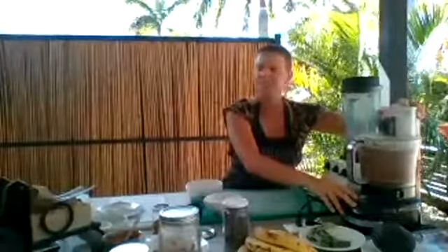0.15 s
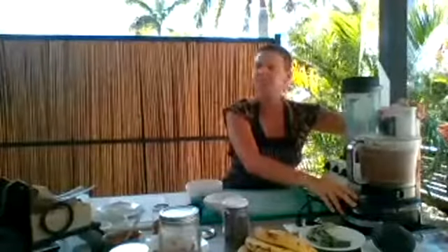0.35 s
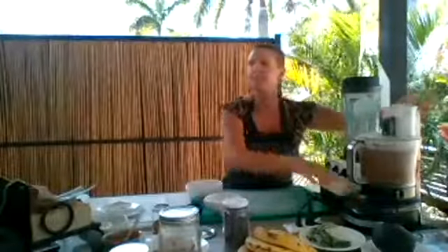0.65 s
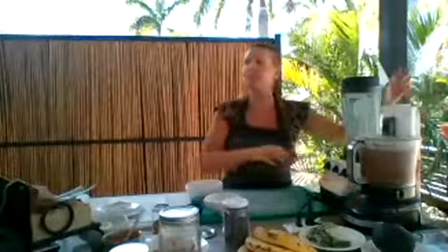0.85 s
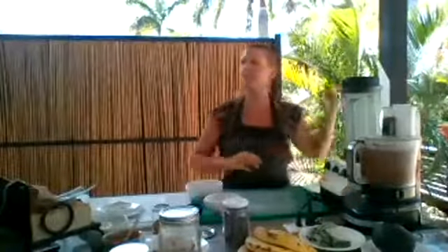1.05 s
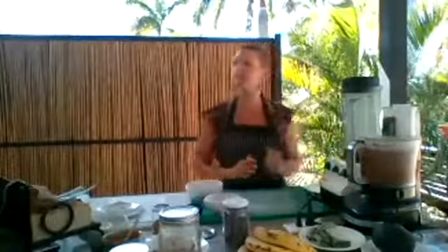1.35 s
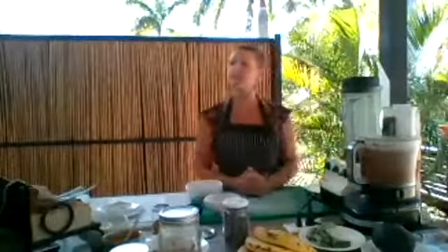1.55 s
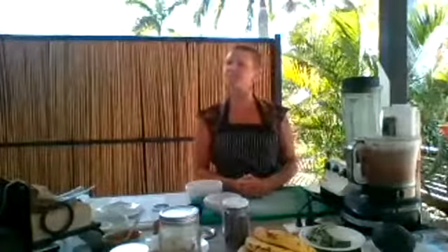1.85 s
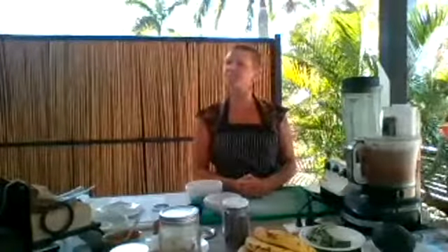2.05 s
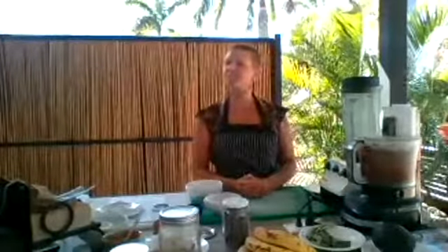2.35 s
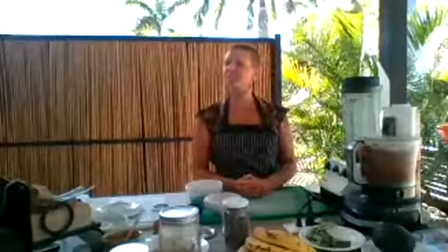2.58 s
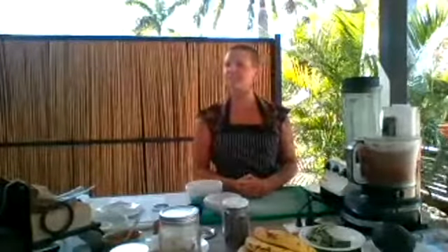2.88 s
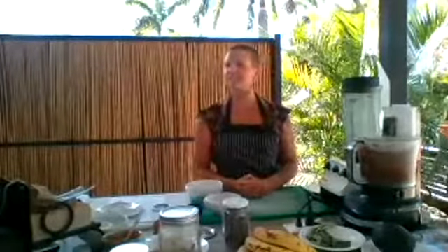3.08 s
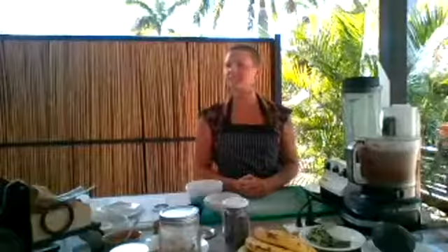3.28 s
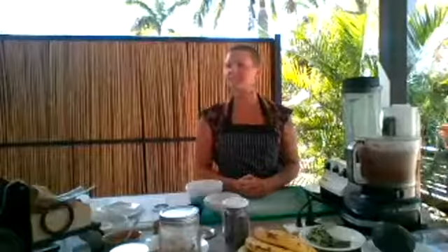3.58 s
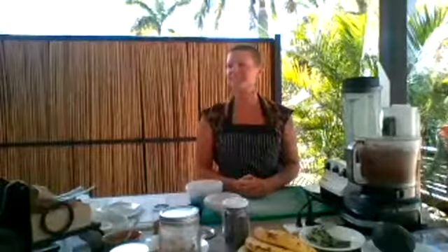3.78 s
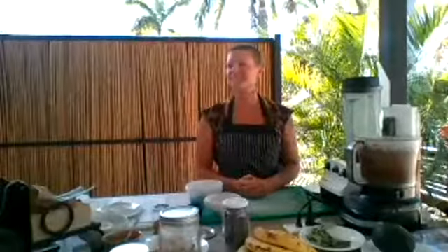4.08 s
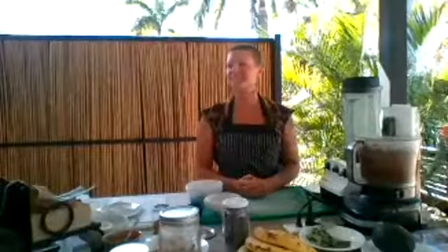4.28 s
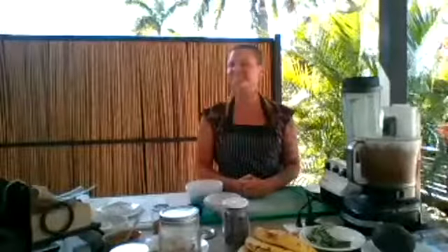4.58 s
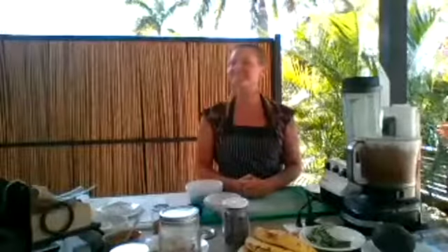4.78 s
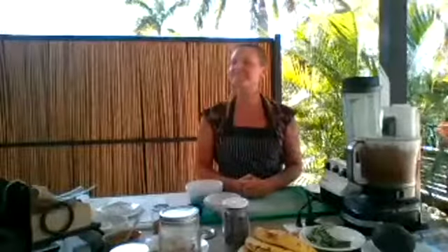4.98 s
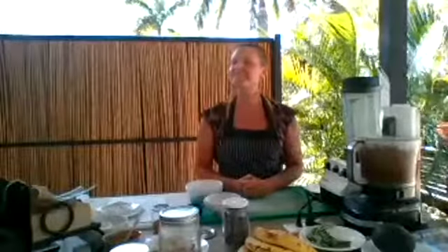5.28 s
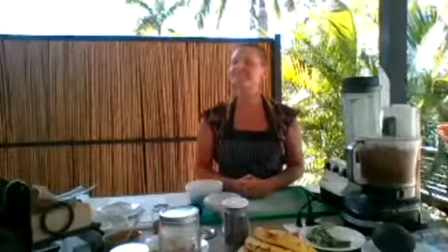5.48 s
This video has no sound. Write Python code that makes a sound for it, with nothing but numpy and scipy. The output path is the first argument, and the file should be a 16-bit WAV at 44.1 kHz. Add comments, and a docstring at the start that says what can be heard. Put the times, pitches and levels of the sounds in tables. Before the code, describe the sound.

A food processor loudly grinds nuts, then drops after two seconds to a quieter, fading motor whine that wavers and throbs.

```python
"""Under an open porch, a food processor grinds nuts on a table, heard through a small mono microphone.
Churning crumbs force the bowl into a resonant roar, pieces snap on the blade, and the base bumps the
table. After two seconds the roar drops at once and fades on, leaving the whine of the drive's meshing
teeth, which sags in pitch when lumps brake the blade and throbs with its turns."""
import sys
import numpy as np
from scipy import signal
from scipy.fft import irfft, next_fast_len
from scipy.io import wavfile
from scipy.ndimage import uniform_filter1d, minimum_filter1d

SR = 44100
rng = np.random.default_rng(int(sys.argv[2]) if len(sys.argv) > 2 else 0)


def waveform_to_disk(signal):
    """Save audio, clipped to [-1, 1], as 16-bit WAV at the path in sys.argv[1]."""
    frames = np.transpose(np.atleast_2d(signal))
    scaled = np.clip(frames, -1, 1) * 32767
    samples = np.round(scaled).astype(np.int16)
    wavfile.write(sys.argv[1], SR, samples)


N = 248283


def gain_of(db):
    """The decibel law: a tenfold amplitude for every 20 dB."""
    return 10 ** (np.asarray(db) / 20)


def unit_rms(x):
    """Normalisation to unit mean power."""
    return x / np.sqrt(np.mean(x ** 2) + 1e-20)


def curves(rows, t):
    """Linear interpolation of each column over time."""
    times, *columns = np.transpose(rows)
    return [np.interp(t, times, column) for column in columns]


def spectrum_db(rows, hz):
    """A spectral envelope, interpolated over logarithmic frequency."""
    f, db = np.transpose(rows)
    return np.interp(np.log(hz + 1), np.log(f + 1), db)


def hump(t, peak_s, length_s, rise_share=0.54):
    """A raised-cosine envelope: up to 1 at peak_s and back to 0."""
    u = (t - peak_s) / np.where(t < peak_s, rise_share * length_s, (1 - rise_share) * length_s)
    return np.cos(np.pi / 2 * np.clip(u, -1, 1)) ** 2


def drift(width_hz):
    """Low-pass Gaussian noise of rms 1, changing about width_hz times a second."""
    size = next_fast_len(N)
    hz = np.fft.rfftfreq(size, 1 / SR)
    hz = hz[hz < 4 * width_hz]
    real, imag = rng.standard_normal((14000, 2))[:len(hz)].T
    rolloff = np.exp(-(hz[:len(real)] / width_hz) ** 2)
    return unit_rms(irfft((real + 1j * imag) * rolloff, size)[:N])


def mottle(shape, bins, frames):
    """A random field of rms 1, correlated in frequency and time by moving averages."""
    field = rng.standard_normal(shape[::-1]).T
    return unit_rms(uniform_filter1d(uniform_filter1d(field, bins, axis=0), frames, axis=1))


def rough_tone(hz, steady, wobble_hz, narrow_hz, wide_hz, skirt, swell=0):
    """Random modulation broadens a spectral line of even strength; swell lifts the carrier alone."""
    carrier = np.exp(2j * np.pi * np.cumsum(hz + wobble_hz * drift(30)) / SR)
    fuzz = drift(narrow_hz) + 1j * drift(narrow_hz) + skirt * (drift(wide_hz) + 1j * drift(wide_hz))
    strength = np.sqrt(uniform_filter1d(abs(steady + fuzz) ** 2, size=4000) / 2)
    return (((steady + fuzz) / strength + swell) * carrier).real


# Envelope of the roar: t/s, level/dB, low-frequency lift/dB
ROAR_LEVELS = [(0, -20, 1.2), (1.2, -20.5, 1.2), (2.12, -20.5, 1.7), (2.17, -31.5, -0.5), (2.33, -32.5, 3),
               (2.41, -30.5, 0), (2.85, -34.5, 1.1), (3.4, -34.5, 1.7), (3.8, -36.5, -.5), (4.25, -35, 3.3),
               (4.57, -42, -0.5), (4.69, -39, 3), (5.16, -45.5, -2.5), (5.3, -46.5, 4), (5.42, -40.5, 3.5),
               (5.63, -46, 3.5)]
# Spectral density of the loud roar: f/Hz, relative level/dB
LOUD_SPECTRUM = [(18, -77), (30, -58), (199, -33.5), (345, -9), (449, -5.5), (569, -6), (684, -12),
                 (1350, -2), (1860, -9.5), (2610, -6.5), (2980, -9.5), (3670, -9), (5310, -15),
                 (6900, -12.5), (16000, -40.5)]
# Spectral density of the faint roar: f/Hz, relative level/dB
FAINT_SPECTRUM = [(15, -83), (25, -50), (127, -48.5), (489, -19.5), (840, -23.5), (1160, -16), (1330, -3),
                  (1840, -22), (2410, -18.5), (2610, -17), (2990, -27.5), (3720, -22), (4490, -32.5),
                  (6740, -26.5), (16000, -55)]
# Resonances of the bowl, plus a broad lift of faint hiss at the very top: f/Hz, bandwidth/Hz, gain/dB
ROAR_PEAKS = [(356, 106, 2), (550, 55, 3), (984, 142, 5.5), (2110, 98, 3), (3650, 240, 2.5),
              (4795, 220, 4.5), (5770, 120, 4), (6780, 660, 4), (15300, 2400, 4.5)]


def bowl_roar(t, loud_db=-25.5, faint_db=-61, impacts_per_s=300):
    """Forced vibration: churning crumbs and flying nut pieces excite the bowl."""
    sizes = gain_of(3 * np.minimum(rng.exponential(1, N), 5))
    impacts = sizes * rng.standard_normal(N) * (rng.random(N) < impacts_per_s / SR)
    force = rng.standard_normal(N) + gain_of(-12) * unit_rms(impacts)
    force *= gain_of(0.91 * drift(27))  # lumps thrown round the bowl
    hz, frame_s, spectra = signal.stft(force, SR, nperseg=1024, noverlap=768)
    level_db, lift_db = curves(ROAR_LEVELS, frame_s)
    loud = np.clip((level_db - faint_db) / (loud_db - faint_db), 0, 1)
    colour_db = np.outer(spectrum_db(LOUD_SPECTRUM, hz), loud)
    colour_db += np.outer(spectrum_db(FAINT_SPECTRUM, hz), 1 - loud)
    colour_db += sum(db / (1 + (2 * (hz - f) / width) ** 2) for f, width, db in ROAR_PEAKS)[:, None]
    colour_db += np.outer(1 / (1 + (hz / 1630) ** 4), lift_db)  # heavier pieces rumble
    colour = gain_of(colour_db)
    colour /= np.linalg.norm(colour[(hz > 2900) & (hz < 9000)], axis=0)  # the level refers to this band
    patches_db = (1.5 + 2.5 * (1 - loud)) * mottle(spectra.shape, bins=6, frames=9)
    streaks_db = 1.55 * mottle(spectra.shape, bins=2, frames=8)  # thin flickering tones
    spectra = spectra * colour * gain_of(patches_db + streaks_db)
    roar = signal.istft(spectra, SR, nperseg=1024, noverlap=768)[1][:N]
    return np.sqrt(len(hz)) * roar * gain_of(curves(ROAR_LEVELS, t)[0])


# Mesh frequency with the blade running free: t/s, f/Hz
FREE_PITCH = [(0, 1340), (1.5, 1324), (2.1, 1297), (2.2, 1257), (4.58, 1261), (4.64, 1335), (5.63, 1327)]
# Envelope of the whine: t/s, fundamental level/dB, octave level/dB
WHINE_LEVELS = [(0, -26, -27), (.7, -25, -28.5), (1.05, -22, -26), (1.4, -22, -29), (1.7, -20.5, -25),
                (2.12, -24.5, -25), (2.17, -29.5, -30.5), (2.7, -26.5, -32.5), (3.6, -26.5, -33),
                (4.4, -26.5, -32), (4.63, -32.5, -38.5), (5.0, -33.5, -37.5), (5.2, -37.5, -38.5),
                (5.35, -34.5, -40.5), (5.63, -39, -43.5)]


def drive_whine(t, roar_db, blade_hz=19, blade_depth=0.13, overtone_sag_share=0.4):
    """Gear-mesh tones: unevenly meshing teeth give rough partials that follow the motor speed."""
    free_hz, = curves(FREE_PITCH, t)
    sag_hz = load_sag(t)
    mesh_hz = free_hz - sag_hz
    upper_hz = free_hz - overtone_sag_share * sag_hz
    level_db, octave_db = curves(WHINE_LEVELS, t)
    gain = gain_of(level_db + 0.93 * drift(4.2))
    turns = np.cumsum(blade_hz * (1 + 0.101 * drift(2.94))) / SR
    blade = 1 + blade_depth * np.cos(2 * np.pi * turns)
    mesh = gain * rough_tone(mesh_hz, 2.57 * blade, 12, 40, 137, 1.13, swell=load_throbs(t) / gain)
    octave = gain_of(octave_db) * rough_tone(1.985 * upper_hz, 1.37, 15.9, 64, 170, 0.89)
    third = gain_of(octave_db - 12) * rough_tone(2.97 * upper_hz, 1.3, 24.67, 67, 250, 0.4)
    fifth = gain_of(-48) * late_sheen(t) * rough_tone(4.99 * mesh_hz, 1.6, 29.7, 60, 200, 0.39)
    return mesh + octave + third + fifth + side_whistle(t, mesh_hz, roar_db)


def side_whistle(t, mesh_hz, roar_db):
    """An inharmonic partial, a major third above the whine, follows the roar and stands out once."""
    gain = gain_of(roar_db - 11.5 + 2.5 * drift(3.8))
    gain += gain_of(-28.5) * hump(t, peak_s=0.39, length_s=0.37)
    return gain * rough_tone(1.25 * mesh_hz, 1.5, 7.63, 22, 60, 0.3)


def blade_hiss(t, roar_db, centre_hz=6850):
    """Aerodynamic noise: air over the blade hisses in a narrow, wandering band."""
    gain = gain_of(roar_db - 17.5 + drift(3.2)) + gain_of(-50) * late_sheen(t)
    return gain * rough_tone(centre_hz + 80 * drift(4.3), 0.54, 49.7, 130, 600, 0.99)


def table_rumble(roar_db, width_hz=110):
    """Structure-borne sound: the table rumbles faintly, more as the roar grows."""
    gain = gain_of(-81) + gain_of(roar_db - 44)
    return gain * gain_of(3 * drift(9)) * drift(width_hz)


# Nut pieces snapping on the blade: t/s, peak level before filtering/dB
NUT_SNAPS = [(0.3456, -12), (0.8689, -8), (0.9268, -5), (1.3997, -11), (1.8455, -4), (2.3485, -19),
             (2.4138, -16), (3.2944, -15), (3.3887, -16)]


def nut_snaps(t60_s=0.019, band_hz=(2200, 8450)):
    """Brittle fracture: each snap is a bright burst of exponentially decaying noise."""
    out, t = np.zeros(N + SR), np.arange(2000) / SR
    cracks = rng.standard_normal((len(NUT_SNAPS), len(t))) * gain_of(-60 * t / t60_s)
    for (start_s, db), crack in zip(NUT_SNAPS, cracks):
        out[round(start_s * SR):][:len(t)] += gain_of(db) * crack / abs(crack).max()
    return signal.sosfilt(signal.butter(2, band_hz, "bandpass", fs=SR, output="sos"), out[:N])


# Bumps of the base on the table: t/s, level/dB
BASE_BUMPS = [(.64, -50.5), (2.12, -51), (2.38, -60), (3.3, -57), (3.67, -60), (3.99, -63), (4.65, -54),
              (5.38, -63)]


def base_bumps(hz=95, length_s=0.02):
    """Impulsive excitation: each push on the table gives a faint pulse of about two low cycles."""
    out, t = np.zeros(N + SR), np.arange(round(length_s * SR)) / SR
    push = np.sin(2 * np.pi * hz * t) * np.hanning(len(t))
    for start_s, db in BASE_BUMPS:
        out[round(start_s * SR):][:len(t)] += gain_of(db) * push
    return out[:N]


# Strong throbs of the whine: t/s at the peak, level of the added tone/dB, duration/s
LOAD_THROBS = [(0.994, -16, 0.039), (1.612, -16, 0.032), (2.074, -18.5, 0.059), (2.723, -24, 0.022),
               (2.93, -24, .05), (2.994, -27, 0.02), (3.022, -30, 0.027), (3.137, -24.5, 0.081),
               (3.188, -23, 0.031), (3.25, -26, 0.037), (3.336, -27, 0.041), (3.39, -25, 0.055),
               (3.507, -21, 0.023), (3.68, -25, .03), (3.877, -25, 0.043), (4.069, -22, 0.035),
               (4.656, -16, 0.028), (4.716, -21.5, 0.024), (4.928, -29, 0.044), (5.028, -24.5, .035),
               (5.091, -26.5, 0.067), (5.145, -22, 0.042), (5.265, -25.5, .06), (5.337, -27, 0.039),
               (5.386, -22, 0.037), (5.448, -25.5, .04), (5.577, -29, 0.045)]


def load_throbs(t):
    """Amplitude modulation: the mesh tone swells under load and lets go again."""
    return sum(gain_of(db) * hump(t, s, length_s, rise_share=0.46) for s, db, length_s in LOAD_THROBS)


# Lumps braking the blade: t/s at the lowest pitch, drop in f/Hz, duration/s
LOAD_SAGS = [(1.6, 55.1, .25), (2.78, 65, .14), (3.049, 50.05, .12), (3.53, 70, .36), (4.09, 75, .14),
             (4.53, 35, .18), (4.919, 60, .17)]


def load_sag(t):
    """Load torque slows the motor: the pitch drops quickly and recovers more slowly."""
    return sum(drop_hz * hump(t, s, length_s, rise_share=0.22) for s, drop_hz, length_s in LOAD_SAGS)


def late_sheen(t):
    """Common modulation: the fifth partial and the hiss swell together once, near the end."""
    return hump(t, peak_s=5, length_s=0.7)


def scene():
    """Superposition: the sources add to one signal, the same in both channels."""
    t = np.arange(N) / SR
    roar_db = curves(ROAR_LEVELS, t)[0]
    mono = bowl_roar(t) + drive_whine(t, roar_db) + blade_hiss(t, roar_db)
    mono += nut_snaps() + table_rumble(roar_db) + base_bumps()
    return np.array([mono, mono])


def record(dry, ceiling=0.76, bass_hz=59.6, edge_hz=15720):
    """Limiting and filtering: a fast limiter holds the peaks down; bass is thinned, top treble cut."""
    held_peak = -minimum_filter1d(-abs(dry), size=301)
    envelope = uniform_filter1d(uniform_filter1d(held_peak, size=151), size=151)
    limited = dry / (1 + (envelope / ceiling) ** 6) ** (1 / 6)
    thin = signal.lfilter(*signal.butter(1, bass_hz, "highpass", fs=SR), limited)
    lowpass = signal.firwin(1023, edge_hz, window=("kaiser", 9), fs=SR)
    return signal.oaconvolve(thin, lowpass[None], "same")


dry = scene()
out = record(dry)
waveform_to_disk(out)
```